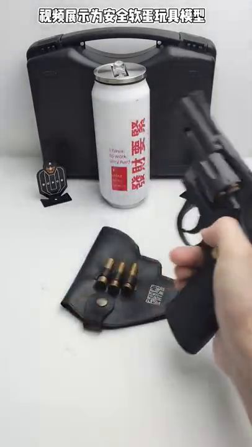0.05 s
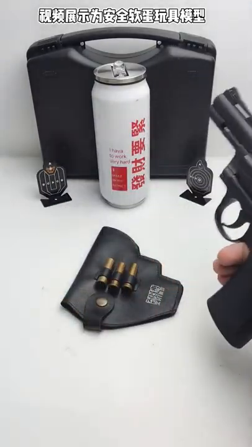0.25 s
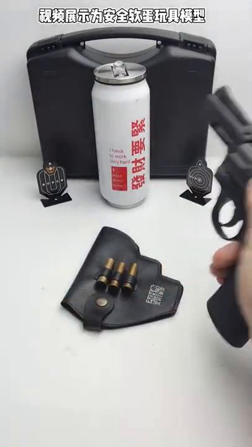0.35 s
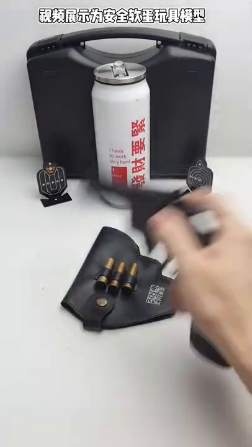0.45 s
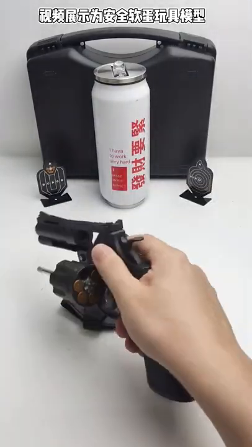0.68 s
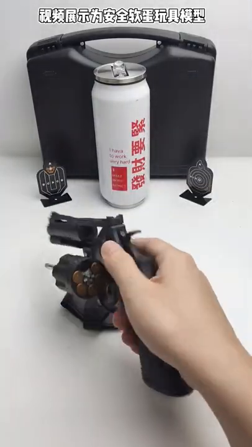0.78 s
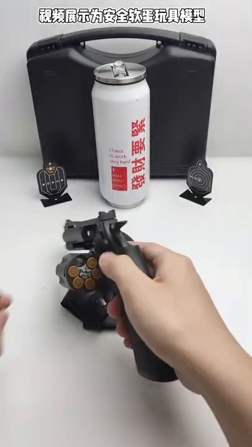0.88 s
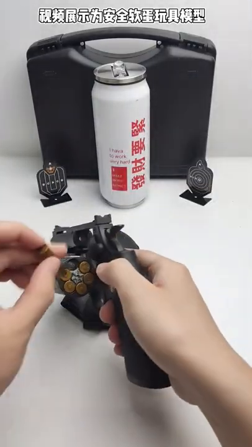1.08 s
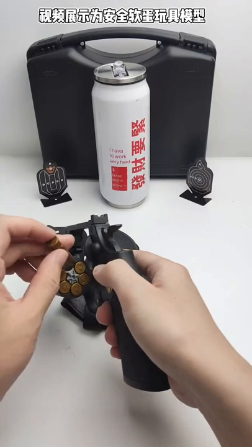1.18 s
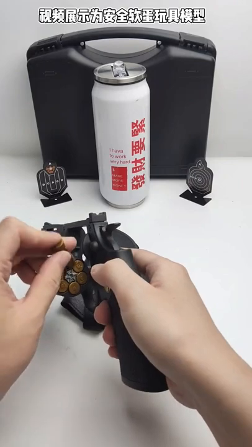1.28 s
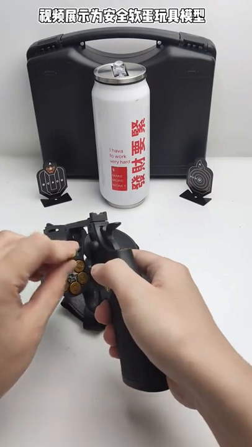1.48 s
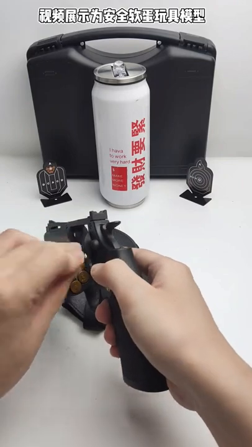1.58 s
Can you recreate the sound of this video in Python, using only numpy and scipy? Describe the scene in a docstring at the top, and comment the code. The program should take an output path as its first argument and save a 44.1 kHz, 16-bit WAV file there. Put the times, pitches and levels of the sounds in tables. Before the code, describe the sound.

A toy revolver's cylinder clacks open with a brief metallic ring, just after the catch snaps. Hand scuffs and two soft clinking knocks follow, then a cartridge rubs into a chamber, close by in a small, live room.

```python
"""A toy revolver is handled over a table in a small, live room. First the catch is thumbed, with a thud and
a snap. The cylinder swings out and strikes its stop: the impact clacks, rattles and sets its metal modes
ringing. A hand scuffs the frame by stick-slip friction, then two soft knocks excite the frame's low modes,
each ending in a light clink. Last, a cartridge is rubbed into a chamber with a hollow, throbbing note.
Room rumble and the low rustle of the hands lie underneath."""
import sys
import numpy as np
from scipy import signal
from scipy.fft import rfft, irfft, next_fast_len
from scipy.io import wavfile
from scipy.ndimage import map_coordinates

SR = 44100
rng = np.random.default_rng(int(sys.argv[2]) if len(sys.argv) > 2 else 0)


def int16_out(signal):
    """Quantize to a 16-bit WAV file."""
    q = np.round(np.clip(np.atleast_2d(signal).T, -1, 1) * 32767)
    wavfile.write(sys.argv[1], SR, q.astype(np.int16))


N = 72765
T = np.arange(N) / SR

# blows on the stop (t/s, clack level/dB, treble level/dB, echo level/dB, echo f/Hz, jolt level/dB)
STOP_BLOWS = [(0.3719, -11, -41, -5.5, 3830, -37), (0.4113, -14, -52, -10, 3380, -25),
              (0.4339, -28, -57, -15, 3100, -28.5), (0.4490, -31.5, -57.5, -24, 2340, -24),
              (0.4593, -34, -50, -23, 2400, -39.5)]
# spectra of the clack and of the frame's dull jolt (f/Hz, level/dB)
CLACK_SPECTRUM = [(50, -33), (120, -5.5), (220, -13), (420, 7.5), (750, -4), (1100, -5), (1450, -10.5),
                  (2200, -3.5), (3100, -6), (4200, -2.5), (4800, -13.5), (7500, -21.5), (10000, -30.5),
                  (15000, -56)]
JOLT_SPECTRUM = [(40, -22), (80, -7.5), (130, 5), (220, -7), (370, -0.5), (600, -11), (1200, -25.5),
                 (4000, -51)]

def swing_out():
    """Impact and rebound: each blow on the stop excites a wide band; a short, pitched echo follows."""
    out = np.zeros(N)
    for start, clack_db, treble_db, echo_db, echo_hz, jolt_db in STOP_BLOWS:
        clack = coloured(crack(t60=0.0052), CLACK_SPECTRUM)
        jolt = coloured(crack(t60=0.032), JOLT_SPECTRUM)
        treble = fade(t60=0.0061) * noise(hump(9000, octaves=0.62))
        echo = coloured(crack(t60=0.0026), hump(echo_hz, octaves=0.14))
        out -= in_room(amp(clack_db) * clack, start, room_db=1)
        out += in_room(amp(jolt_db) * jolt, start, room_db=2.5)
        out += in_room(amp(treble_db) * treble, start, room_db=-1)
        out += in_room(amp(echo_db) * echo, start + 0.0024, room_db=-9)
    return out


# modes of the metal cylinder (f/Hz, beat rate/Hz, T60/s)
CYLINDER_MODES = [(2358, 30, .4), (2955, 14, .26), (3130, 19, .28), (3511, 52, .36), (3665, 50, .36),
                  (4237, 5, .65), (4244, 23, .11), (6862, 7, .55), (7651, 2, .44), (8500, 3, .25),
                  (11608, 3, .26)]
# the clack, its rebound and two clinks (t/s, then level/dB of each mode)
CYLINDER_STRIKES = [(0.3724, -47, -42, -41, -42, -41, -40, -32, -45, -44, -57, -48),
                    (0.4505, -42, -46, -45, -46, -45, -52, -60, -70, -70, -75, -80),
                    (0.869, -64, -68, -68, -70, -72, -75, -68, -75, -71, -55, -70),
                    (1.021, -70, -80, -80, -76, -76, -68, -49, -85, -63, -60, -86)]

def cylinder_ring():
    """Free vibration: each point struck favours other modes, and each mode beats with a weaker twin."""
    out = np.zeros(N)
    for start, *levels in CYLINDER_STRIKES:
        ring = np.zeros(N)
        for (hz, beat_hz, t60), db in zip(CYLINDER_MODES, levels):
            pair = np.sin(2 * np.pi * hz * T) + amp(-3.5) * np.sin(2 * np.pi * (hz + beat_hz) * T)
            flutter_db = 1.5 * wobble(rate=35)
            ring += amp(db + flutter_db) * fade(t60) * pair
        out += in_room(ring, start, room_db=-9)
    return out


# light contacts of metal (t/s, level/dB, centre f/Hz)
METAL_TICKS = [(0.259, -41, 4750), (0.328, -57, 10000), (0.4617, -37.5, 6940), (0.869, -37.5, 4200),
               (1.007, -53.5, 8100), (1.022, -41.5, 4360), (1.44, -63, 5700), (1.518, -50, 3620)]

def ticks():
    """Impulse excitation: each light contact of metal sounds one heavily damped resonance."""
    out = np.zeros(N)
    for start, db, hz in METAL_TICKS:
        tick = coloured(crack(t60=0.0096), hump(hz, octaves=0.22))
        out += in_room(amp(db) * tick, start, room_db=-8.5)
    return out


# the thumb on the catch, then two soft knocks
# (t/s, thud level/dB, pitch factor, thump level/dB, snap level/dB, snap f/Hz, snap half-width/octaves)
FRAME_KNOCKS = [(0.2431, -20.5, 0.89, -30.5, -29.5, 5820, 0.29),
                (0.8600, -28.5, 1.026, -38.5, -34, 2250, 0.34), (1.009, -32.5, 1.053, -41, -56, 5370, 0.52)]
# modes of frame and grip (f/Hz at pitch factor 1, relative level/dB, T60/s)
FRAME_MODES = [(203, -11, 0.076), (315.3, -3.5, 0.022), (393, 4, 0.035), (478, -4, 0.026),
               (584, -16.5, 0.039)]
# spectrum of the snap's broadband part (f/Hz, level/dB)
SNAP_SPECTRUM = [(500, -20), (1200, 20), (4200, 25.5), (7000, -35), (14000, -30)]

def knocks():
    """Damped modes: the struck frame thuds with a short snap; a low thump swells slightly later."""
    thud_attack_s, thump_attack_s, thump_hz, snap_t60 = 0.0012, 0.012, 108.6, 0.025
    thump = fade(t60=0.079) * (1 - np.exp(-T / thump_attack_s)) * np.sin(2 * np.pi * thump_hz * T)
    out = np.zeros(N)
    for start, thud_db, pitch, thump_db, snap_db, snap_hz, octaves in FRAME_KNOCKS:
        thud = sum(amp(db) * fade(t60) * np.sin(2 * np.pi * hz * pitch * T)
                   for hz, db, t60 in FRAME_MODES)
        thud *= 1 - np.exp(-T / thud_attack_s)
        snap = fade(snap_t60) * noise(hump(snap_hz, octaves))
        snap += amp(-10.5) * coloured(crack(snap_t60), SNAP_SPECTRUM)
        out -= in_room(amp(thud_db) * thud, start, room_db=1.5)
        out += in_room(amp(thump_db) * thump / thump.max(), start, room_db=-4)
        out += in_room(amp(snap_db) * snap, start, room_db=-5)
    return out


# slips of the hand and the cylinder's arm on the frame (t/s, surface level/dB, length/s, body level/dB)
SLIPS = [(0.593, -43, 0.0012, -58), (0.611, -50, 0.0027, -44.5), (0.6315, -49, 0.0023, -64),
         (0.634, -34.5, 0.0031, -62), (0.64, -58, 0.0017, -49), (0.6845, -35.5, 0.002, -35.5),
         (0.6893, -34.5, 0.0027, -33.5), (0.6934, -38, 0.003, -37), (0.700, -41, 0.0029, -43),
         (0.7048, -31, 0.0018, -68), (0.7124, -46, 0.0024, -57)]
# spectra of the bright surface and of the hollow body (f/Hz, level/dB)
SURFACE_SPECTRUM = [(80, -17), (300, -9), (1500, -4.5), (4500, -2), (7000, 1.5), (8000, -5.5), (8900, 3.5),
                    (9800, -3.5), (12000, -11), (15000, -8.5)]
BODY_SPECTRUM = [(60, -49), (150, -3), (280, -0.5), (480, -6), (640, 9), (850, -13.5), (1700, -14),
                 (4500, -14), (9000, -29)]

def scuffs():
    """Stick-slip friction: each slip is a swelling cluster of tiny catches, filtered by surface and body."""
    out = np.zeros(N)
    for start, surface_db, length, body_db in SLIPS:
        catches = rng.standard_normal(N) * amp(2.3 * wobble(rate=1500)) * swell(T, peak_s=length / 2)
        surface = amp(surface_db) * coloured(catches, SURFACE_SPECTRUM)
        body = amp(body_db) * coloured(catches, BODY_SPECTRUM)
        out += in_room(surface + body, start, room_db=-8.5)
    return out


# envelope of the cartridge's friction (t/s, level/dB)
RUB_ENVELOPE = [(1.2, -74), (1.23, -44.5), (1.26, -45), (1.35, -53), (1.395, -51.5), (1.44, -55),
                (1.53, -60), (1.65, -86)]
# spectrum of that friction (f/Hz, level/dB)
RUB_SPECTRUM = [(120, -33), (300, 2.5), (500, -1), (1000, -5.5), (1900, -16.5), (3000, -27.5), (6000, -49),
                (12000, -74)]

def cartridge():
    """Friction-driven resonance: a scrape at the rim, a low sagging note, a faint ring of the cylinder."""
    touch_s, slide_s, in_phase_s, ring_s = 1.2, 1.23, 1.26, 1.34
    note_hz, sag_hz_per_s, beat_hz = 269.5, 25, 14.15
    elapsed = np.maximum(T - touch_s, 0)
    onset = np.minimum(elapsed / 0.057, 1)
    rub_db = curve(RUB_ENVELOPE)
    rub = amp(rub_db + 1.36 * wobble(rate=69.7)) * noise(RUB_SPECTRUM)
    scrape = amp(-60.5) * swell(elapsed, peak_s=0.028) ** 2 * noise(hump(1320, octaves=0.51))
    # the hollow note follows the friction's level and beats against a close neighbour
    hz = note_hz - sag_hz_per_s * (T - slide_s) + 6 * wobble(rate=45.15)
    note_db = -41 + 0.48 * (rub_db - rub_db.max()) + 1.2 * wobble(rate=35.67)
    phase = 2 * np.pi * np.cumsum(hz) / SR
    beat_phase = 2 * np.pi * beat_hz * (T - in_phase_s)
    note = amp(note_db) * (np.sin(phase) + amp(-4.5) * np.sin(phase + beat_phase))
    ring_envelope = np.clip((T - ring_s) / 0.034, 0, 1) * fade(t60=2.4, t=T - ring_s)
    ring = amp(-70) * ring_envelope * noise(hump(4235, octaves=0.012))
    return (rub + note) * onset + scrape + ring


# envelope of the hands' rustle (t/s, level/dB)
RUSTLE_ENVELOPE = [(0, -83), (0.5, -48), (0.75, -56), (0.95, -55.5), (1.1, -45.5), (1.25, -56), (1.65, -54)]
# spectra of the rustle and of the room's rumble (f/Hz, level/dB)
RUSTLE_SPECTRUM = [(40, -12.5), (110, 0.5), (250, 6), (500, -10), (1000, -21), (3000, -28), (10000, -126)]
RUMBLE_SPECTRUM = [(25, 2), (45, -2.5), (65, -6), (110, -4), (190, 1), (300, -7), (500, -10), (1000, -20),
                   (2500, -29), (6000, -39), (15000, -44.5)]

def background():
    """Low-frequency noise: stationary for the room's rumble, amplitude-modulated for the hands' rustle."""
    rustle_db = curve(RUSTLE_ENVELOPE) + 2 * wobble(rate=25)
    rumble = amp(-51.5) * noise(RUMBLE_SPECTRUM)
    return rumble + amp(rustle_db) * noise(RUSTLE_SPECTRUM)


# reverberation time of the room (f/Hz, T60/s)
ROOM_DECAY = [(120, 0.65), (400, 0.3), (1000, 0.74), (3000, 0.68), (7000, .55), (14000, 0.32)]

def in_room(x, start, room_db):
    """Reverberation: x sounds at start, followed by early reflections and a diffuse, decaying tail."""
    build_up_s = 0.0027
    hz, t, spectra = signal.stft(rng.standard_normal(N), SR, nperseg=256)
    late = fade(along(ROOM_DECAY, hz)[:, None], t)
    early = amp(-2.5) * fade(0.072, t)
    response = signal.istft(spectra * (late + early), SR, nperseg=256)[1][:N]
    response *= 1 - np.exp(-(T / build_up_s) ** 2)
    reflected = signal.fftconvolve(x, response / np.linalg.norm(response))[:N]
    return np.pad(x + amp(room_db) * reflected, (round(start * SR), 0))[:N]


def crack(t60, contact=0.9):
    """Impact excitation: one clean impulse, then brief chatter; contact squared is the impulse's share."""
    force = rng.standard_normal(N) * fade(t60)
    force *= np.sqrt(1 - contact ** 2) / np.linalg.norm(force)
    force[0] = contact
    return force * np.sqrt(t60 * SR / np.log(1e6))  # the energy of unit noise decaying over t60


def coloured(x, points):
    """Minimum-phase filtering: x through a causal filter of unit energy and shape (f/Hz, level/dB)."""
    size = 2 * next_fast_len(N)
    gain = amp(along(points, np.fft.rfftfreq(size, 1 / SR)))
    cepstrum = irfft(np.log(gain), size)
    cepstrum[1:size // 2] *= 2
    cepstrum[size // 2 + 1:] = 0
    response = irfft(np.exp(rfft(cepstrum)), size)[:N]
    return signal.fftconvolve(x, response / np.linalg.norm(response))[:N]


def noise(points):
    """Spectral shaping: noise of rms 1 with the spectrum (f/Hz, level/dB)."""
    x = coloured(rng.standard_normal(N), points)
    return x / np.sqrt(np.mean(x ** 2) + 1e-20)


def hump(hz, octaves):
    """Resonance curve (f/Hz, level/dB), at half power the given octaves either side of hz."""
    f = np.geomspace(30, 20000, 80)
    db = -10 * np.log10(1 + (np.log2(f / hz) / octaves) ** 4)
    return np.transpose([f, db])


def amp(db):
    """Level in decibels to amplitude ratio."""
    return 10 ** (np.asarray(db) / 20)


def fade(t60, t=T):
    """Exponential decay, 60 dB in t60 seconds."""
    return np.exp(-np.log(1000) * t / t60)


def swell(t, peak_s):
    """Critically damped pulse: it rises to 1 at peak_s and dies away."""
    return t / peak_s * np.exp(1 - t / peak_s)


def along(points, hz):
    """Interpolation of (f/Hz, value) points on a logarithmic frequency axis."""
    f, values = np.transpose(points)
    return np.interp(np.log(hz + 1), np.log(f + 1), values)


def curve(points):
    """Linear interpolation of (t/s, value) points at every sample."""
    return np.interp(T, *np.transpose(points))


def wobble(rate):
    """Random modulation: a smooth curve with rate knots a second."""
    return map_coordinates(rng.standard_normal(int(N * rate / SR) + 4), [T * rate])


def scene():
    """Superposition: all sources add at one microphone."""
    return (knocks() + swing_out() + ticks() + cylinder_ring() + scuffs() + cartridge() + background())[None]


def record(dry):
    """Band limiting: the microphone thins the deep bass; the recorder keeps nothing above its top limit."""
    low_cut_hz, top_hz = 37, 15750
    thinned = signal.sosfilt(signal.butter(1, low_cut_hz, 'highpass', fs=SR, output='sos'), dry)
    size = next_fast_len(2 * N)
    passband = np.fft.rfftfreq(size, 1 / SR) < top_hz
    return irfft(rfft(thinned, size) * passband, size)[..., :N]


dry = scene()
out = record(dry)
int16_out(out)
```